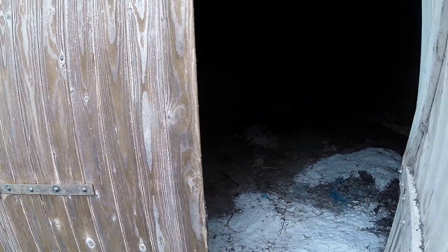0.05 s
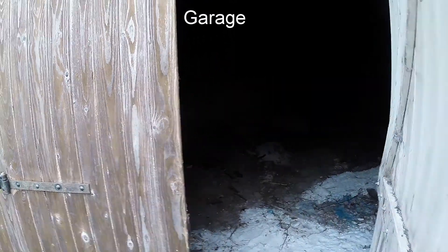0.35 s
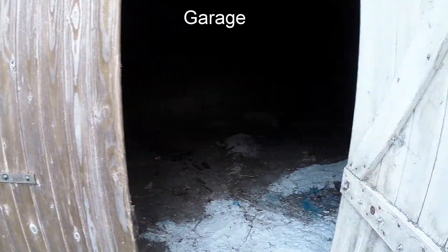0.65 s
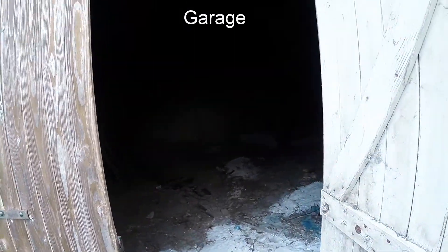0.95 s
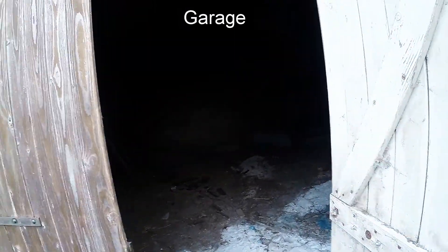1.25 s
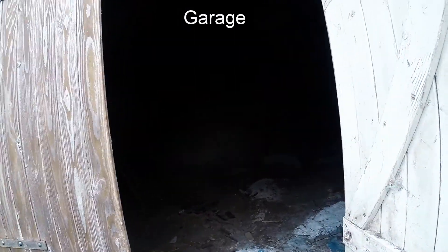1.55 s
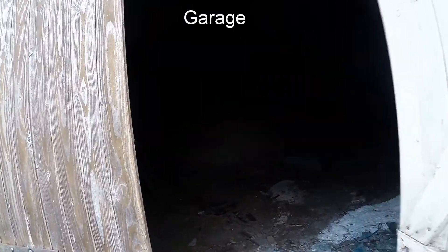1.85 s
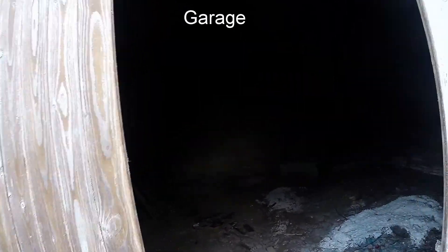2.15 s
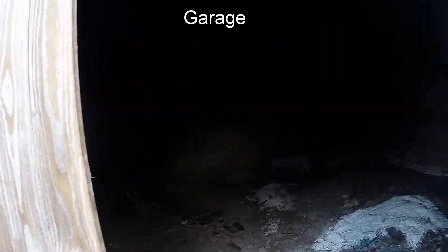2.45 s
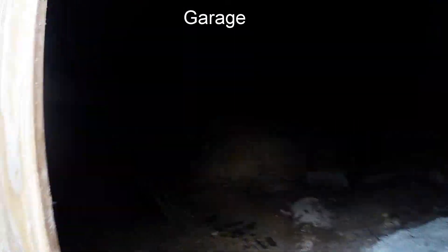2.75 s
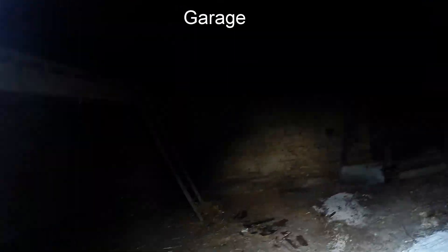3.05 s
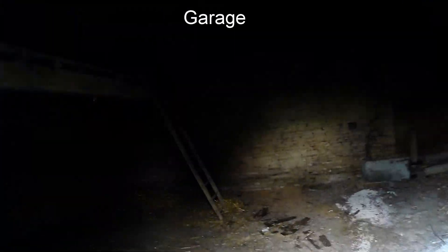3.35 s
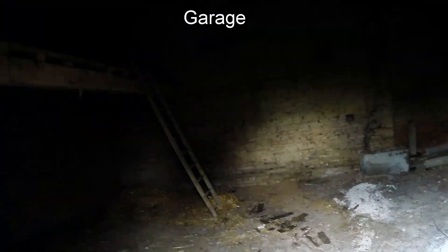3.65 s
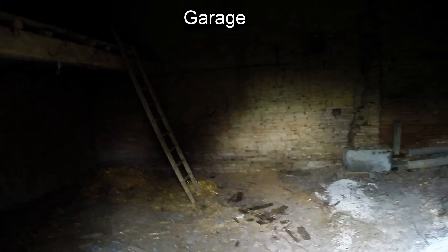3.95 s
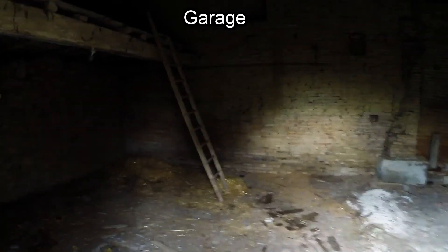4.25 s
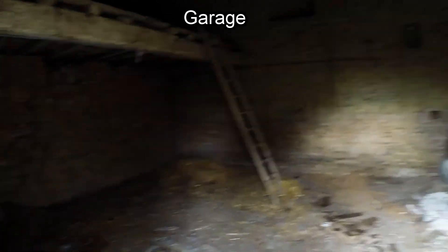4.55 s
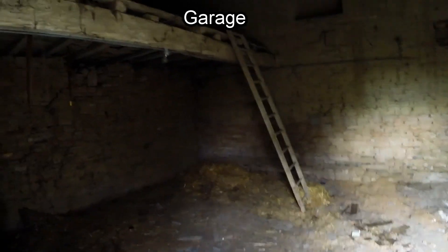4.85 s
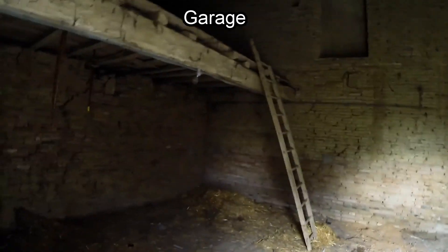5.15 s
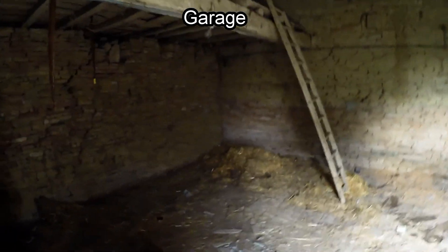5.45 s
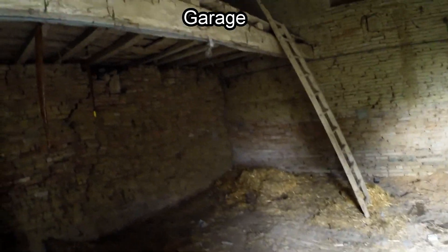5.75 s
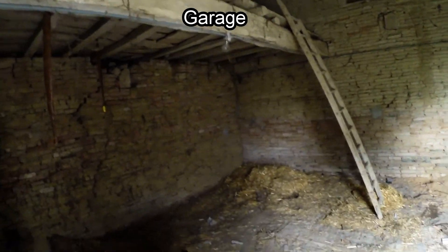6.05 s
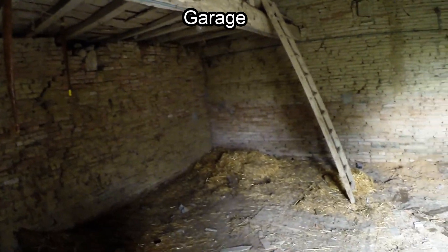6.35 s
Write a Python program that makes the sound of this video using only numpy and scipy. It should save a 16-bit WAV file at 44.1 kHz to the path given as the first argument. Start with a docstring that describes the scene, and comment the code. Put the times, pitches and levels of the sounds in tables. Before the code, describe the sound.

In a stone outbuilding with a short echo, wooden doors bang, scrape and rattle their iron fittings as they are pushed open. Slow, quiet footsteps follow on a gritty, straw-covered floor, with one loud snap and several smaller ones. Something hollow clacks irregularly right by the microphone, and the steps end in a couple of crunches. Moving air rumbles lightly on the microphone over a faint hiss.

```python
"""A stone garage. Heavy plank doors are shoved open: they scrape the ground, shudder, knock and boom,
and their iron fittings clink. Someone walks in: straw and grit rustle, snap and grind underfoot,
with faint squeaks and a soft swish. Something hollow clacks close by. Each blow rings damped modes
and echoes off the walls. Moving air rumbles on the microphone over hiss and a thin electronic whine."""
import sys
import numpy as np
from scipy import signal
from scipy.fft import rfft, irfft
from scipy.io import wavfile

SR = 44100
rng = np.random.default_rng(int(sys.argv[2]) if len(sys.argv) > 2 else 0)


def master_out(mix):
    """Clip the mix to full scale and print it as 16-bit PCM to the path in sys.argv[1]."""
    frames = np.transpose(np.atleast_2d(mix))
    ceiling = np.clip(frames, -1, 1)
    pcm = np.round(ceiling * 32767).astype(np.int16)
    wavfile.write(sys.argv[1], SR, pcm)


N = 287091
TIME = np.arange(N) / SR


def amp(db):
    """Decibels to gain."""
    return 10 ** (np.asarray(db) / 20)


def unit(x):
    """Scales to unit rms."""
    return x / np.sqrt(np.mean(x ** 2) + 1e-20)


def at_hz(points, hz):
    """Interpolates a table on a log-frequency axis."""
    f, value = np.transpose(points)
    return np.interp(np.log(hz + 1), np.log(f + 1), value)


def add(mix, start_s, sound):
    """Mixes a sound in at a time."""
    part = mix[max(round(start_s * SR), 0):][:len(sound)]
    part += sound[:len(part)]


def colour(x, eq, size=8192):
    """Causal filter from (frequency [Hz], gain [dB]) rows; clicks keep their sharp fronts."""
    log_gain = np.log(amp(at_hz(eq, abs(np.fft.fftfreq(size, 1 / SR)))))
    taps = np.fft.ifft(np.exp(np.conj(signal.hilbert(log_gain)))).real[:size // 2]
    return signal.oaconvolve(x, taps)[:len(x)]


def noise(eq, n=N):
    """Coloured noise, unit rms."""
    return unit(colour(rng.standard_normal(n), eq))


def wander(max_hz):
    """Slow random motion, unit rms."""
    return unit(irfft(rfft(rng.standard_normal(N)) * (np.fft.rfftfreq(N, 1 / SR) < max_hz), N))


def grains(per_s, spread_db):
    """Random tiny impacts, most small, a few large."""
    size = amp(spread_db * np.minimum(rng.exponential(1, N), 4))
    return size * rng.choice([-1, 1], N) * (rng.random(N) < per_s / SR)


def strokes(starts_s, holds_s, levels_db, attack_s, fall_db_per_s):
    """Envelope of strokes that rise, hold and die away."""
    power = np.zeros(N)
    age_s = TIME[:2 * SR]
    for start_s, hold_s, db in np.broadcast(starts_s, holds_s, levels_db):
        rise = np.minimum(age_s / attack_s, 1)
        fall = amp(db - fall_db_per_s * np.maximum(age_s - hold_s, 0))
        add(power, start_s, (rise * fall) ** 2)
    return np.sqrt(power)


def swells(rows):
    """Envelope of Gaussian swells."""
    return np.sqrt(sum(amp(db) ** 2 * np.exp(-2 * ((TIME - s) / half_s) ** 2) for s, db, half_s in rows))


def pings(rows):
    """One damped sine per row."""
    out = np.zeros(N)
    t = TIME[:SR // 2]
    for start_s, hz, db, t60_s in rows:
        add(out, start_s, amp(db - 60 * t / t60_s) * np.sin(2 * np.pi * hz * t))
    return out


# Wall echo: (frequency [Hz], t60 [s])
WALL_DECAY = [(100, 0.63), (500, 0.18), (1000, 0.2), (3000, 0.18), (8000, 0.14)]
def garage(x, gap_s=0.0076):
    """Dense echoes off stone; the treble dies first."""
    taps = rng.standard_normal(SR) * (rng.random(SR) < 3000 / SR) * (np.arange(SR) > gap_s * SR)
    hz, t, spectrum = signal.stft(taps, SR, nperseg=256)
    decay = amp(-60 * t / at_hz(WALL_DECAY, hz)[:, None])
    tail = signal.istft(spectrum * decay, SR)[1]
    return signal.fftconvolve(x, tail / np.linalg.norm(tail))[:N]


def blows(rows, modes, signs, crush_eq, crush_db, crush_t60_s, low_cut_hz, room_db, echo_gap_s):
    """Each blow rings the modes and crushes the contact. Like signs crack; alternating signs knock."""
    direct, send = np.zeros(N), np.zeros(N)
    t = TIME[:SR // 5]
    hz, db, t60_s = np.transpose(modes)[:, :, None]
    polarity = np.resize(signs, hz.shape)
    radiation = signal.butter(4, low_cut_hz, "high", fs=SR, output="sos")
    for start_s, level_db, bass_db, treble_db in rows:
        spot, detune = rng.standard_normal((2, *hz.shape))  # each spot favours other modes
        decay = amp(db + 1.6 * spot - 60 * t / t60_s)
        ring = (polarity * decay * np.sin(2 * np.pi * hz * (1 + .018 * detune) * t)).sum(0)
        crush = noise(crush_eq, len(t)) * amp(crush_db - 60 * t / crush_t60_s)
        hit = signal.sosfilt(radiation, ring / abs(ring).max() + crush)
        hit = colour(hit, [(550, bass_db), (900, 0), (1200, 0), (2200, treble_db), (5500, treble_db),
                           (14000, treble_db - 16.5)])  # contact time softens the top
        hit *= amp(level_db) / np.sqrt(np.sum(hit ** 2) / (.001 * SR))  # level as energy over 1 ms
        add(direct, start_s, hit)
        add(send, start_s, hit * amp(room_db - 0.126 * (level_db + 20)))  # fainter blows are wetter
    return direct + garage(send, echo_gap_s)


# Door shoves, relative levels: (start [s], hold [s], scrape [dB], shudder [dB], air [dB])
DOOR_SHOVES = [(0, 0.0068, -39.5, -32, -42), (.06, 0.034, -44.5, -62, -60),
               (0.216, 0.084, -32.5, -44, -34.5), (0.355, 0.1, -28.5, -31.5, -32.5),
               (0.553, 0.086, -31, -39, -45), (0.644, 0.066, -22.5, -27.5, -34),
               (0.9, .11, -37.5, -32, -36), (1.07, 0.11, -51, -44, -41.5)]
def shoves(part, fall_db_per_s):
    """Envelope of one part of the shoves: each scrapes the edge, shakes the leaf and pushes air."""
    start_s, hold_s, scrape_db, shudder_db, air_db = np.transpose(DOOR_SHOVES)
    db = {"scrape": scrape_db, "shudder": shudder_db, "air": air_db}[part]
    return strokes(start_s, hold_s, db, attack_s=0.0067, fall_db_per_s=fall_db_per_s)


# Steady draught: (time [s], relative level [dB])
DRAUGHT_LEVELS = [(0, -58), (1.4, -50), (1.8, -58.5), (2.4, -49), (3.4, -48.5), (4.6, -54), (6.5, -66)]
# Strides swaying the microphone: (time [s], relative level [dB])
STRIDE_SWAYS = [(2.01, -43.5), (2.53, -41.5), (3.04, -39.5), (4.02, -42)]
# Air rumble: (frequency [Hz], gain [dB])
AIR_EQ = [(10, -5.5), (28, 7), (50, 1), (80, -0.5), (120, -9.5), (200, -20.5), (350, -49), (800, -65)]
def air_rumble():
    """Air on the microphone: a lumpy draught, stirred by shoves and strides."""
    time_s, draught_db = np.transpose(DRAUGHT_LEVELS)
    lumps_db = 2.1 * wander(max_hz=3.6)
    fade = np.interp(TIME, [time_s[-1], time_s[-1] + .05], [1, 0])
    draught = amp(np.interp(TIME, time_s, draught_db) + lumps_db) * fade
    pushed = shoves("air", fall_db_per_s=74)
    stride_s, stride_db = np.transpose(STRIDE_SWAYS)
    swayed = strokes(stride_s, 0.037, stride_db, attack_s=0.027, fall_db_per_s=70)
    return amp(1) * noise(AIR_EQ) * np.sqrt(draught ** 2 + pushed ** 2 + swayed ** 2)


# Noise floor: (frequency [Hz], gain [dB])
HISS_EQ = [(60, 0.5), (150, -3), (330, -7), (700, -10.5), (1000, -8.5), (1400, -16.5), (2500, -20),
           (4500, -26.5), (5050, -24), (5700, -25.5), (8000, -33.5), (9500, -36), (10000, -30),
           (10600, -36), (15000, -39)]
# Whine partials: (frequency [Hz], relative level [dB])
WHINE_TONES = [(13905, -77.5), (13846, -86), (13787, -91)]
def hiss_and_whine(pip_hz=5520, pips_per_s=9.4):
    """Steady hiss, close electronic tones beating as they drift, and faint pips."""
    hiss = noise(HISS_EQ)
    drift_hz = 7 * wander(max_hz=18)
    whine = sum(amp(db) * unit(np.sin(2 * np.pi * np.cumsum(hz + drift_hz) / SR))
                for hz, db in WHINE_TONES)
    gate = np.maximum(np.cos(2 * np.pi * pips_per_s * (TIME - .08)), 0) ** 4
    phase = 2 * np.pi * pip_hz * TIME
    pips = gate * (np.sin(phase) + amp(-5) * np.sin(2 * phase))
    return amp(-52) * hiss + amp(2) * whine + amp(-67.5) * pips


# Door edge on the ground: (frequency [Hz], gain [dB])
SCRAPE_EQ = [(100, -9), (220, -4), (400, -4), (600, 0), (900, 1.5), (1180, -5.5), (1450, -15),
             (2400, -18.5), (3600, -23), (5200, -32), (8000, -38.5), (13000, -63)]
def door_scrape():
    """The lower edge catches and slips over grit."""
    slips = amp(1.66 * wander(max_hz=45))
    grit = unit(colour(grains(per_s=900, spread_db=2.5) * slips, SCRAPE_EQ))
    drag = grit * shoves("scrape", fall_db_per_s=181)
    return amp(-3) * drag + amp(-9) * garage(drag)


def door_shudder():
    """The moving leaf shakes on its hinges."""
    leaf_eq = [(40, -20), (75, -29), (92, -3.5), (110, -8.5), (150, -8.5), (200, -13.5), (260, -22.5),
               (600, -60.5)]
    return amp(-7.5) * noise(leaf_eq) * shoves("shudder", fall_db_per_s=89)


# Blows on the door: (time [s], relative level [dB], bass [dB], treble [dB])
DOOR_BLOWS = [(.132, -28.5, 2.5, 2.5), (.208, -32.5, -21, 19), (.2162, -26.5, -3, 15), (.244, -25, 13, 24),
              (.272, -26.5, 7, 15), (.292, -24, 11, 4.5), (.365, -3.5, -2, -12.5), (.3725, -6.5, -3, 3.5),
              (.377, -8, -4, -5), (.386, -15.5, 25, 1), (.408, -20.5, 18, 12.5), (.569, -24.5, 11, -1.5),
              (.632, -14.5, 6, -0.5), (.662, -22, -1, -19), (.682, -15.5, 11.5, 6.5),
              (.7025, -5.5, 3.5, -14), (.7252, -7.5, 1.5, -19), (.754, -16.5, 4, -6), (.9212, -19, 0.5, -9),
              (.990, -34, 3, 12), (1.027, -31.5, 7, 7), (1.034, -23.5, 4, -11), (1.348, -37, 15.5, -4),
              (1.9435, -37, -6, -21), (1.957, -34.5, -3, -3), (2.005, -35, -12, -9),
              (2.075, -27.5, -20, -4)]
# Planks: (frequency [Hz], gain [dB], t60 [s])
PLANK_MODES = [(226, -17, 0.096), (347, -14, 0.055), (612, -4, 0.019), (810, -9, 0.036), (891, 0, 0.04),
               (1022, 3.5, 0.014), (1200, -14, 0.12), (1510, -20, 0.06), (2105, -17.5, 0.056),
               (2680, -48, 0.023), (3084, -15.5, 0.034), (3503, -15, 0.022), (5500, -23, 0.0098)]
def door_knocks():
    """Blows ring the planks; weight and hardness set bass and treble."""
    crush_eq = [(150, -5.5), (1000, 4), (1600, -1.5), (4000, -18), (7000, -22.5), (13000, -25)]
    return amp(.7) * blows(DOOR_BLOWS, PLANK_MODES, signs=[-1, 1], crush_eq=crush_eq, crush_db=-6.5,
                           crush_t60_s=0.034, low_cut_hz=110, room_db=-13.5, echo_gap_s=0.012)


# Iron fittings: (time [s], frequency [Hz], level [dB], t60 [s])
IRON_CLINKS = [(0.242, 1770, -25.5, 0.034), (0.243, 2700, -27.5, 0.043), (0.373, 3950, -16.5, 0.011),
               (.373, 4970, -29, 0.016), (0.408, 2970, -24.5, 0.015), (0.566, 2550, -39, 0.029),
               (.633, 3680, -26, 0.026), (0.679, 4200, -32, 0.047), (0.702, 2570, -18, 0.019),
               (0.724, 3180, -24.5, 0.03), (0.726, 2090, -18, 0.025)]
def fitting_clinks():
    """Latch and hinge straps ping as the door shakes."""
    clinks = pings(IRON_CLINKS)
    return clinks + amp(-19) * garage(clinks)


# Booms of the leaf: (time [s], level [dB])
LEAF_BOOMS = [(0.37, -39), (0.4038, -23), (0.934, -42)]
def door_booms(mode_hz=93.4, t60_s=0.55):
    """The jolted leaf rings at its lowest mode."""
    return pings((start_s, mode_hz, db, t60_s) for start_s, db in LEAF_BOOMS)


# Soles on straw: (start [s], hold [s], relative level [dB])
SOLE_TREADS = [(1.926, 0.2, -56), (2.609, 0.013, -52), (2.685, 0.15, -58), (3.587, 0.048, -62),
               (4.157, 0.075, -51.5), (4.348, .14, -54), (4.828, 0.32, -55.5), (5.6, 0.3, -60),
               (6.006, .03, -49), (6.043, 0.016, -41.5)]
# Straw: (frequency [Hz], gain [dB])
STRAW_EQ = [(120, -21), (250, -4), (450, -6.5), (750, -3.5), (1050, -2.5), (1450, -11), (2200, -14.5),
            (3500, -21.5), (6000, -27), (9000, -35.5), (14000, -47)]
def straw_rustle():
    """Stalks crackle under each sole."""
    weight = strokes(*np.transpose(SOLE_TREADS), attack_s=0.01, fall_db_per_s=160)
    rustle = unit(colour(grains(per_s=2500, spread_db=3.5), STRAW_EQ)) * weight
    return amp(3) * rustle + amp(-28) * garage(rustle)


# Faint squeaks: (start [s], length [s], first pitch [Hz], last pitch [Hz], level [dB])
SQUEAK_GLIDES = [(1.986, .075, 11200, 12700, -66), (5.10, .2, 5850, 5200, -67)]
def squeaks():
    """Thin tones swell, glide and fade."""
    out = np.zeros(N)
    for start_s, length_s, first_hz, last_hz, db in SQUEAK_GLIDES:
        progress = np.arange(0, length_s, 1 / SR) / length_s
        cycles = np.cumsum(first_hz + (last_hz - first_hz) * progress) / SR
        add(out, start_s, amp(db) * np.sin(np.pi * progress) * np.sin(2 * np.pi * cycles))
    return out


# Straw and grit breaking: (time [s], relative level [dB], bass [dB], treble [dB])
BREAKS = [(2.6335, -25.5, -6, 3.5), (2.6603, -2.5, -1, -0.5), (2.895, -33.5, -18, -6),
          (2.9195, -20.5, -23, -5), (2.961, -25.5, 2, -3.5), (3.594, -31, -3, -8), (4.170, -25, -10, 0),
          (4.216, -21.5, -18, -29), (4.388, -27.5, -1.5, -2), (5.388, -23.5, -5.5, -18),
          (5.596, -40, -19, -17), (6.0485, -16.5, -14.5, -0.5), (6.109, -34, -1, -16),
          (6.2112, -18, -7, -10)]
# Ring of a break: (frequency [Hz], gain [dB], t60 [s])
BREAK_MODES = [(330, -13, 0.0058), (512, 15, 0.026), (664, 11.5, 0.026), (858, 15, 0.017),
               (990, 0.5, 0.042), (1300, -1, 0.011), (2100, -3, 0.034), (2320, -13, 0.023),
               (3850, 3, 0.016), (4600, -42, .026), (4770, -26, 0.031)]
def straw_snaps():
    """Straw and grit crack underfoot, all modes starting in phase."""
    crush_eq = [(200, -11), (950, 15), (1300, 0), (1900, -11), (2400, 4), (3100, -12.5), (4200, -5),
                (6000, -18), (7500, -19), (13000, -25)]
    return amp(-3.5) * blows(BREAKS, BREAK_MODES, signs=[-1], crush_eq=crush_eq, crush_db=-10.5,
                             crush_t60_s=0.033, low_cut_hz=225, room_db=-18.5, echo_gap_s=.028)


# Jolts of a hollow body: (time [s], relative level [dB], bass [dB], treble [dB])
HOLLOW_JOLTS = [(4.207, -27.5, -8.5, -3.5), (4.269, -34, 3, 0), (4.448, -19, -5, -2), (4.491, -35, 10, 5),
                (4.519, -26.5, 0.5, -5), (4.671, -13.5, -3.5, -13), (4.678, -17, -15, 0),
                (4.695, -24.5, -1, 7), (4.746, -36, 8, -5), (4.863, -19.5, -11, 9), (4.867, -17.5, 31.5, 5),
                (4.8742, -15.5, 7.5, 7), (4.901, -23.5, -13, -20), (4.909, -27, -6, -36),
                (5.0583, -25.5, -6, 2), (5.065, -21.5, -5, -3), (5.1064, -5, -3.5, -4),
                (5.109, -21.5, -2, 3), (5.403, -19.5, 5.5, 6.5), (5.477, -15, -8, 1.5),
                (5.573, -43.5, 29, -12)]
# Hollow body: (frequency [Hz], gain [dB], t60 [s])
HOLLOW_MODES = [(379, 1.5, 0.033), (460, -2, 0.051), (560, 3.5, 0.046), (723, -8.5, 0.039),
                (946, -8.5, 0.024), (1155, -6, 0.011), (1507, -7.5, 0.018), (1950, -22.5, 0.059),
                (2594, -16, 0.026), (3080, -20.5, 0.029), (3610, -20, 0.021), (4000, -50, 0.012),
                (5200, -33, 0.014), (6100, -40, 0.014)]
def hollow_clacks(thump_hz=58, thump_t60_s=0.083):
    """Something hollow is jolted close by, almost dry; each clack also thumps the microphone."""
    crush_eq = [(200, -2), (700, 16), (1500, -2), (3500, -8.5), (6000, -11), (7000, -32), (13000, -35)]
    clacks = blows(HOLLOW_JOLTS, HOLLOW_MODES, signs=[-1, 1], crush_eq=crush_eq, crush_db=-13.5,
                   crush_t60_s=0.015, low_cut_hz=314, room_db=-30.5, echo_gap_s=.008)
    thumps = pings((start_s, thump_hz, db + 0.28 * bass_db, thump_t60_s)
                   for start_s, db, bass_db, _ in HOLLOW_JOLTS)
    return amp(0.75) * clacks + amp(-21.5) * thumps


# Grinding grit: (centre [s], relative level [dB], half length [s])
GRIT_SWELLS = [(4.845, -43.5, 0.016), (4.867, -29.5, 0.012)]
# Grit: (frequency [Hz], gain [dB])
GRIT_EQ = [(200, -4.5), (500, 11), (1000, 6), (1300, -16), (1800, 12.5), (2250, -22), (2900, 1),
           (3900, 0.5), (4500, -18), (6200, -6), (6800, -29), (13000, -36)]
def grit_grind():
    """Grit grinds underfoot in brief bursts of tiny impacts."""
    return amp(1) * unit(colour(grains(per_s=3400, spread_db=1.5), GRIT_EQ)) * swells(GRIT_SWELLS)


# Swishes: (centre [s], level [dB], half length [s])
SWISH_SWELLS = [(4.86, -57, 0.033), (5.01, -57.5, 0.029), (5.15, -62.5, 0.18), (5.37, -66, 0.07)]
def swish():
    """Something soft swishes: fine noise swells and fades."""
    swish_eq = [(300, -11), (1500, 8), (3500, 4), (6000, -7), (9500, -4.5), (14000, -28)]
    return noise(swish_eq) * swells(SWISH_SWELLS)


def scene():
    """All sources at one microphone."""
    door = door_scrape() + door_shudder() + door_knocks() + fitting_clinks() + door_booms()
    walk_in = straw_rustle() + squeaks() + straw_snaps() + hollow_clacks() + grit_grind() + swish()
    return (air_rumble() + hiss_and_whine() + door + walk_in)[None]


def record(dry, cutoff_hz=15350):
    """The recorder's band limit."""
    low_pass = signal.firwin(511, cutoff_hz, window=("kaiser", 9), fs=SR)
    return signal.oaconvolve(dry, low_pass[None], "same")


dry = scene()
out = record(dry)
master_out(out)
```